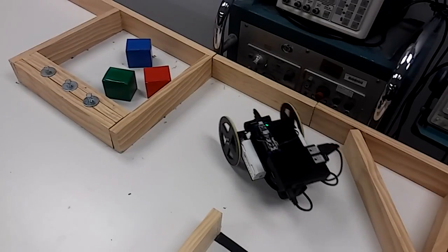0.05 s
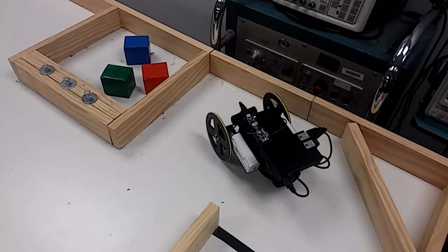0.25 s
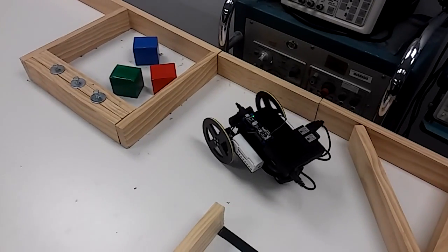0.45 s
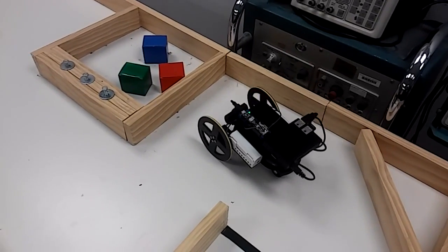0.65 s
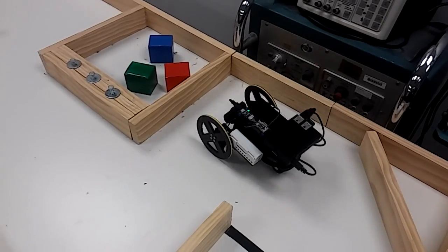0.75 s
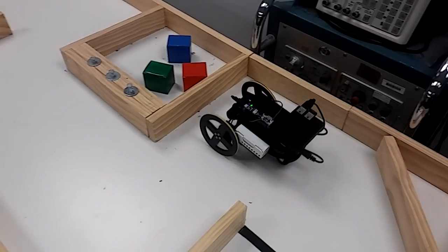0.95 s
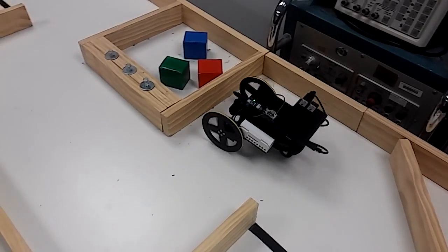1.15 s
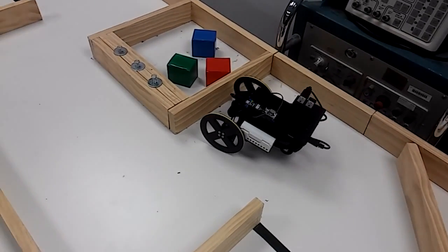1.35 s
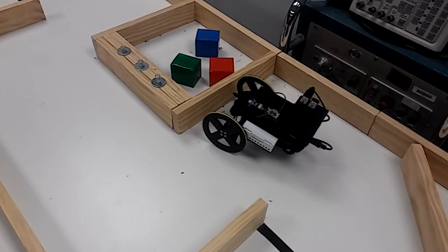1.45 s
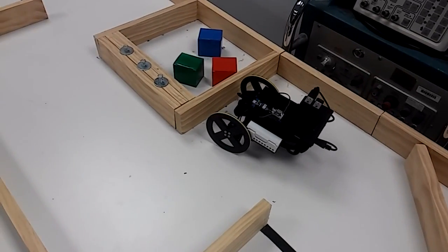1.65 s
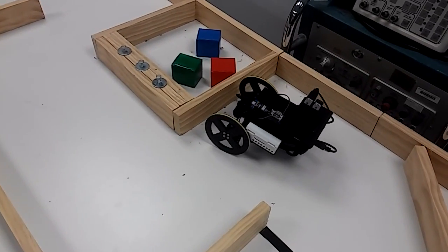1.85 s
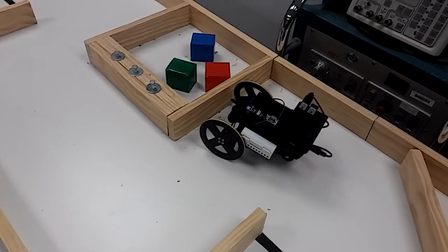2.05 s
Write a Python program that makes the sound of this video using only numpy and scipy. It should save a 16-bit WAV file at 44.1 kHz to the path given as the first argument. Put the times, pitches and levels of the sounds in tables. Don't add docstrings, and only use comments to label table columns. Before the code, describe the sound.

A small robot car's geared motors whine and hiss while its caster judders knocking across a hollow tabletop

```python
import sys
import numpy as np
from scipy import signal
from scipy.fft import rfft, irfft
from scipy.io import wavfile
from scipy.ndimage import uniform_filter1d

SR = 44100
rng = np.random.default_rng(int(sys.argv[2]) if len(sys.argv) > 2 else 0)


def amplitude_ratio(level_db):
    exponent = np.asarray(level_db, float) / 20
    return 10 ** exponent


def int16_out(signal):
    q = np.round(np.clip(np.atleast_2d(signal).T, -1, 1) * 32767)
    wavfile.write(sys.argv[1], SR, q.astype(np.int16))


N = 92610
t = np.arange(N) / SR
START_S, STOP_S = .013, 1.486


def level(x, db):
    return x * amplitude_ratio(db) / np.sqrt(np.mean(x ** 2))


def white():
    return rng.standard_normal(N)


def shaped(x, pts):
    hz, db = np.transpose(pts)
    f = np.maximum(np.arange(N // 2 + 1) * SR / N, 1)
    return irfft(rfft(x) * amplitude_ratio(np.interp(np.log(f), np.log(hz), db)), N)


def peak(x, hz, q):
    return signal.lfilter(*signal.iirpeak(hz, q, SR), x)


def walk(rate_hz):
    k = int(SR / rate_hz)
    w = uniform_filter1d(uniform_filter1d(white(), k), k)
    return w / w.std()


def add(out, at_s, x):
    i = max(int(at_s * SR), 0)
    out[i:i + len(x)] += x


def ring(at_s, hz, t60_s, rise_s):
    i = max(int(at_s * SR), 0)
    u = np.maximum(t[:, None] - at_s, 0)[i:i + SR // 3]
    return np.sin(2 * np.pi * hz * u) * (1 - np.exp(-u / rise_s)) * 1000. ** (-u / t60_s)


def bump(hz):
    v = np.pi * hz * (np.arange(400) / SR - .0045)
    return (1 - 2 * v ** 2) * np.exp(-v ** 2)


def board_knocks():
    # [t/s, peak/dB, brightness/dB, crack/dB]
    blows = [(0.049, -45.5, 1, -24), (0.087, -29.5, -8, -35), (0.158, -15.5, -23.5, -24),
             (0.231, -4.5, -4, -37), (0.298, -3.5, -7.5, -9), (0.371, -13, -13.5, -45),
             (0.438, -3.5, -7.5, -14.5), (0.508, -2.5, -5, -12), (0.581, -6, -9.5, -8),
             (0.661, -3, -7.5, -13), (0.746, -26.5, -24.5, -10.5), (0.818, -15.5, -42, -33.5),
             (0.873, -37.5, -4.5, -4.5), (0.919, -16, -31, -16.5), (0.987, -6.5, -36.5, -23),
             (1.068, -18, -41.5, -29), (1.142, -8, -10.5, -6.5), (1.23, -17, -20.5, -10),
             (1.305, -12, -10.5, 2), (1.382, -8, -2, -6.5), (1.458, -26.5, -4.5, -21),
             (1.562, -29, -12, -14.5)]
    # [f/Hz, level/dB, t60/s]
    modes = [(135, -21, 0.2), (224.7, -17, 0.072), (287.3, -12, 0.075), (381.8, 4, 0.1), (447.3, -8, 0.041),
             (560, -9.5, 0.07), (633.2, -7, 0.08), (677, -8.5, 0.089), (797.8, 0, 0.053), (870, -8, 0.042),
             (1036.6, -7.5, 0.077), (1121.4, -11, 0.08), (1582, -24.5, 0.065), (1882, -18, 0.028)]
    late_s, bounce_s, bounce_db = .001289, .028, -17
    rise_s, scatter_db, detune = .0009, 1.2, .003
    tick_hz, tick_db, tick_t60_s = np.array((3680, 2700)), np.array((-32, -34)), .022
    crack_hz, thud_db, thud_t60_s = 520, -21, .16
    out = np.zeros(N)
    mode_hz, mode_db, mode_t60_s = np.transpose(modes)
    wood = level(shaped(white(), [(60, -53.5), (200, -8.5), (400, -3.5), (1100, -5.5), (1500, -23.5),
                                  (4000, -30), (7000, -48.5)]), 0)
    u = np.arange(SR // 3) / SR
    thud_env = (1 - np.exp(-u / .0014)) * 1000. ** (-u / thud_t60_s)
    for s, db, bright_db, crack_db in blows:
        s += late_s
        tilt_db = (bright_db + 9) * np.clip(np.log2(mode_hz / 450) / .8, 0, 1.1)
        soft_s = rise_s * amplitude_ratio(-.15 * bright_db)
        for lag_s, hit_db in ((0, 0), (bounce_s, bounce_db)):
            chance = rng.standard_normal(len(mode_hz))
            gains = amplitude_ratio(db - 9.5 + hit_db + mode_db + tilt_db + scatter_db * chance)
            hz = mode_hz * (1 + detune * chance[::-1])
            add(out, s + lag_s, ring(s + lag_s, hz, mode_t60_s, soft_s) @ gains)
        add(out, s, ring(s, tick_hz, tick_t60_s, .00046) @ amplitude_ratio(db + tick_db + bright_db + 11))
        add(out, s - .0012, bump(crack_hz) * amplitude_ratio(db + crack_db))
        i = int(s * SR)
        thud = wood[i:i + len(u)] * thud_env
        add(out, s, thud * amplitude_ratio(db + thud_db + .69 * (bright_db + 12)))
    return out


def caster_bumps():
    # [t/s, level/dB, f/Hz]
    bumps = [(.375, -16, 287), (.9245, -16, 317), (.938, -24.5, 250), (.972, -29, 301), (.9905, -16.5, 240),
             (1.072, -24.5, 290), (1.338, -21.5, 410), (1.3859, -8.5, 790), (1.394, -10.5, 600),
             (1.415, -16.5, 416), (1.461, -17, 356), (1.478, -23, 404)]
    out = np.zeros(N)
    for s, db, hz in bumps:
        add(out, s - .0045, bump(hz) * amplitude_ratio(db))
    return out


def settling():
    # [t/s, level/dB, f/Hz, t60/s]
    rocks = [(.855, -45, 3000, .04), (.921, -27, 205, .1), (.925, -31, 125, .15), (.99, -31, 120, .15),
             (1.07, -30, 130, .15), (1.115, -46, 3800, .05), (1.19, -34, 95, .2), (1.235, -31, 120, .2),
             (1.26, -48, 3750, .06), (1.262, -32, 900, .06), (1.31, -31, 110, .15), (1.325, -47, 3700, .07),
             (1.39, -42, 3750, .04), (1.422, -46, 3700, .04), (1.53, -33, 140, .12), (1.575, -37, 130, .15),
             (1.6, -43, 385, .3), (1.635, -43, 385, .3), (1.668, -42, 390, .3), (1.7, -44, 388, .2),
             (1.768, -42.5, 378, .19), (1.84, -65, 4600, .2), (1.911, -58, 3714, .12),
             (1.912, -59, 800, .05), (1.917, -59, 2630, .04), (1.935, -59, 2630, .05),
             (1.933, -51, 250, .3), (1.975, -49, 250, .35)]
    out = np.zeros(N)
    for s, db, hz, t60_s in rocks:
        trio = ring(s, hz * np.array([1, 1.045, .97]), t60_s, 3 / hz)
        add(out, s, trio @ amplitude_ratio(db + np.array([0, -13, -14])))
    return out


def gear_mesh(hz, hold=.55):
    # [multiple, level/dB]
    teeth = [(2, -14), (3, -7), (4, -2), (5, 1), (6, 2), (7, -6), (8, -6), (9, -22)]
    pinion_teeth, chop_db = 28, 5.5
    turn = np.cumsum(hz / pinion_teeth * (1 + .12 * walk(30))) / SR
    k = turn.astype(int)
    held_hz = (np.bincount(k, hz) / np.bincount(k))[k]
    phase = 2 * np.pi * np.cumsum(hz + hold * (held_hz - hz)) / SR
    chop = chop_db * np.clip(-1.6 * np.cos(2 * np.pi * turn), -1.6, .8)
    throb_db = 1.5 * walk(250) + 1.5 * white()[k] + chop
    throb_db = uniform_filter1d(throb_db, size=60)
    out = np.zeros(N)
    for n, db in teeth:
        out += amplitude_ratio(db + throb_db + 2.2 * walk(90)) * np.sin(n * phase + n * n)
    return level(out, 0)


def housing(x, flicker_db=0):
    # [f/Hz, width/Hz, level/dB]
    gearbox = [(3614, 230, -13.5), (5160, 180, -2), (6300, 220, -5.5), (7245, 310, 13.5), (8840, 200, -3.5),
               (12140, 780, 7)]
    out = np.zeros(N)
    for k, (hz, width_hz, db) in enumerate(gearbox):
        out += amplitude_ratio(db + flicker_db * walk(46)) * peak(x, hz, hz / width_hz) * (-1) ** k
    return out


def gear_whine(sag):
    # [slowest t/s, mesh f/Hz, fastest t/s, mesh f/Hz]
    mesh = [(.045, 1450, .075, 1595), (.11, 1575, .14, 1605), (.175, 1490, .22, 1612),
            (.245, 1555, .285, 1628), (.325, 1500, .365, 1775), (.395, 1735, .43, 1795),
            (.45, 1670, .465, 1705), (.485, 1655, .507, 1650), (.52, 1485, .53, 1490),
            (.542, 1450, .57, 1560), (.605, 1420, .65, 1630), (.692, 1465, .75, 1575),
            (.77, 1540, .8, 1620), (.835, 1415, .88, 1580), (.928, 1490, .98, 1630),
            (1.015, 1500, 1.05, 1595), (1.097, 1410, 1.13, 1585), (1.18, 1440, 1.222, 1585),
            (1.242, 1520, 1.28, 1605), (1.315, 1600, 1.37, 1675), (1.41, 1490, 1.445, 1615),
            (1.47, 1560, 1.5, 1600)]
    mesh_s, mesh_hz = np.array(mesh).reshape(-1, 2).T
    left_hz = uniform_filter1d(np.interp(t, mesh_s, mesh_hz), size=300) + 9 * walk(170)
    right_hz = 1760 + 60 * walk(14) + 50 * sag + 35 * walk(90)
    left, right = gear_mesh(left_hz), gear_mesh(right_hz)
    return level(left + .6 * housing(left), -44.5) + level(right + .4 * housing(right), -54)


def slip_squeaks(cycle, sag):
    slip_hz, fall_hz_per_s, slip_s = 1720, 14000, .007
    since_s = ((2 * cycle + .6) % 1 - .5) / 27
    squeak = gear_mesh(slip_hz - fall_hz_per_s * since_s + 40 * walk(30), hold=0)
    squeak = level(peak(np.diff(squeak, append=0), 11900, 6), -43)
    return squeak * np.exp(-(since_s / slip_s) ** 2) * amplitude_ratio(3 * sag - 3 + walk(20))


def brush_hiss(sag):
    # [f/Hz, gain/dB]
    colour = [(880, -50), (1500, -23.5), (1950, -8), (2840, -10.5), (3770, -7), (5000, -4), (7480, 2.5),
              (12900, -11.5), (15600, -12)]
    grit = white() * amplitude_ratio(2 * walk(2000))
    hiss = level(shaped(grit, colour), -47) + level(housing(grit, 2.6), -45.5)
    for patch_hz in (3790, 4500, 5580):
        hiss += level(peak(grit, patch_hz, 7), -62) * amplitude_ratio(4.5 * walk(22))
    return hiss * amplitude_ratio(1.2 * sag + walk(70))


def rolling():
    # [f/Hz, gain/dB]
    colour = [(24, -47.5), (40, -33.5), (134, 1.5), (359, 7.5), (567, -14.5), (813, -5), (1440, -18.5),
              (1620, -12.5), (2000, -69), (2600, -63), (4400, -120)]
    return level(shaped(white(), colour), -47) * amplitude_ratio(6.3 * walk(13))


def running(rise_s, fall_s):
    return np.clip((t - START_S) / rise_s, 0, 1) * np.exp(-np.maximum(t - STOP_S, 0) / fall_s)


def drive():
    dips_s = [.03, .105, .175, .25, .32, .39, .455, .54, .6, .69, .77, .84, .93, 1.015, 1.09, 1.185, 1.247,
              1.325, 1.41, 1.48]
    cycle = np.interp(t, dips_s, np.arange(len(dips_s)))
    sag = np.cos(2 * np.pi * cycle)
    motors = gear_whine(sag) + slip_squeaks(cycle, sag) + brush_hiss(sag)
    return running(.035, .005) * motors + running(.031, .1) * rolling()


def room(x):
    low_t60_s, top_t60_s, room_db = .47, .3, -13.5
    u = np.arange(SR) / SR
    n = rng.standard_normal(SR)
    low = signal.sosfilt(signal.butter(2, 1500, fs=SR, output="sos"), n)
    tail = low * 1000. ** (-u / low_t60_s) + (n - low) * 1000. ** (-u / top_t60_s)
    tail *= np.clip(u / .016 - .3, 0, 1)
    return signal.fftconvolve(x, tail / np.sqrt(np.sum(tail ** 2)))[:N] * amplitude_ratio(room_db)


def ballast():
    mains_hz, duty, buzz_hz, overtone = 60, .62, 7350, 1.985
    chop = uniform_filter1d(1. * ((t * mains_hz + .3) % 1 < duty), 60)
    phase = 2 * np.pi * np.cumsum(buzz_hz + 50 * walk(400)) / SR
    upper = np.sin(overtone * phase + .55 * walk(900))
    return chop * amplitude_ratio(-74) * np.sin(phase) + (.3 + chop) * amplitude_ratio(-73) * upper


def room_air():
    # [f/Hz, gain/dB]
    colour = [(15, -74), (25, -38.5), (156, -26.5), (260, -8.5), (446, -30.5), (2640, -32.5), (3180, -34.5),
              (3640, -31), (15600, -52)]
    drone = level(peak(white(), 127, 2.5), -75.5) + level(peak(white(), 50, .7), -61.5)
    return drone + level(shaped(white(), colour), -68) * amplitude_ratio(2.6 * walk(14))


def scene():
    car = board_knocks() + caster_bumps() + settling() + drive()
    car = car * amplitude_ratio(-4)
    return (car + room(car) + ballast() + room_air())[None]


def top_cut(x):
    return signal.sosfilt(signal.butter(12, 15740, fs=SR, output="sos"), x)


def record(dry):
    # [t/s, gain/dB]
    gate = [(0, -4), (0.03, -4), (0.082, 3.5), (1.55, 5.5), (1.802, 5), (1.843, -4.5), (1.901, -20),
            (1.915, 1), (2.028, 1), (2.056, -13), (2.1, -15)]
    gate_s, gate_db = np.transpose(gate)
    low_cut_hz = 142
    x = signal.sosfilt(signal.butter(3, low_cut_hz, "high", fs=SR, output="sos"), dry)
    return top_cut(x * amplitude_ratio(np.interp(t, gate_s, gate_db)))


dry = scene()
out = record(dry)
int16_out(out)
```